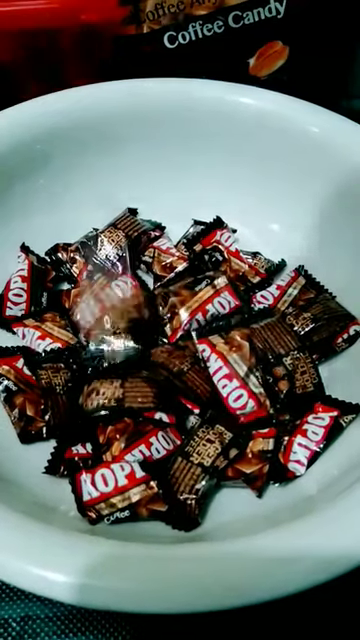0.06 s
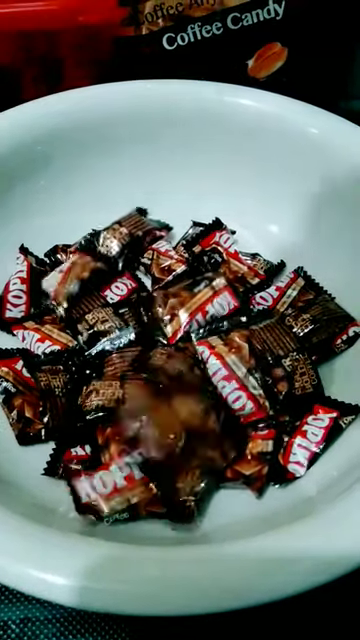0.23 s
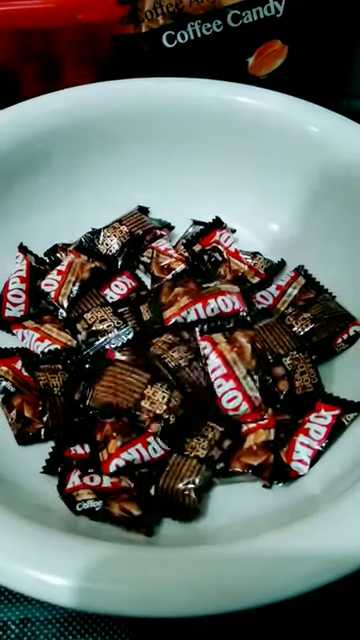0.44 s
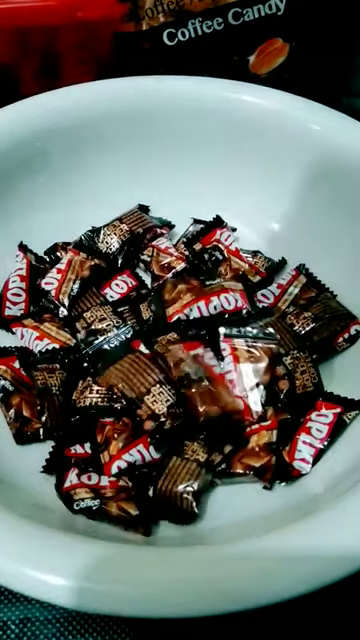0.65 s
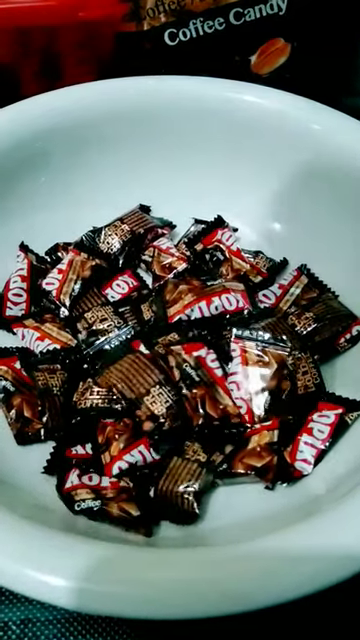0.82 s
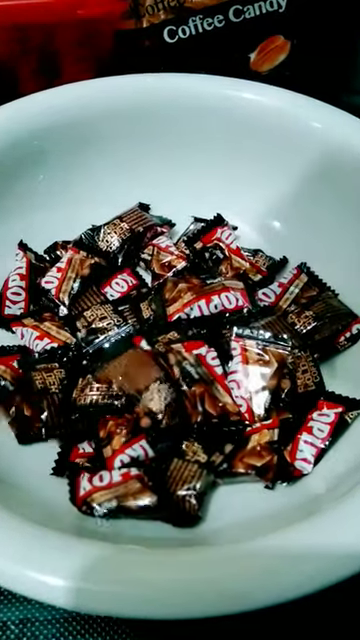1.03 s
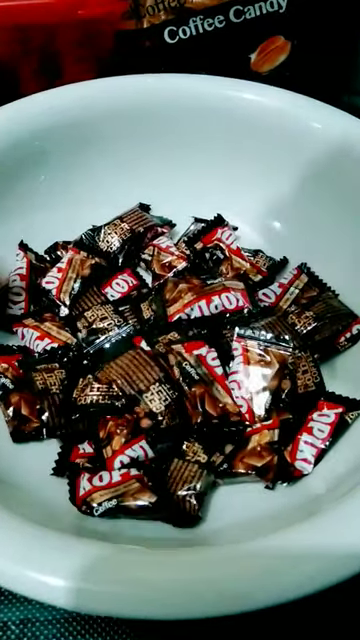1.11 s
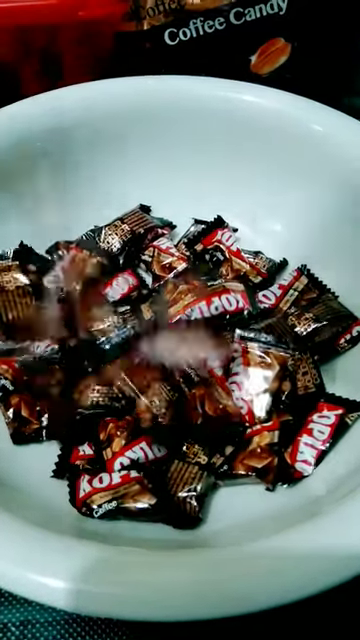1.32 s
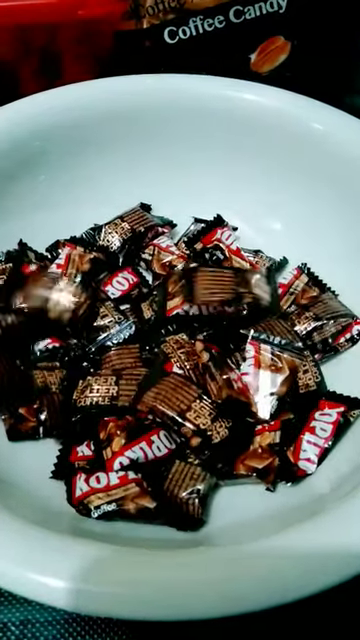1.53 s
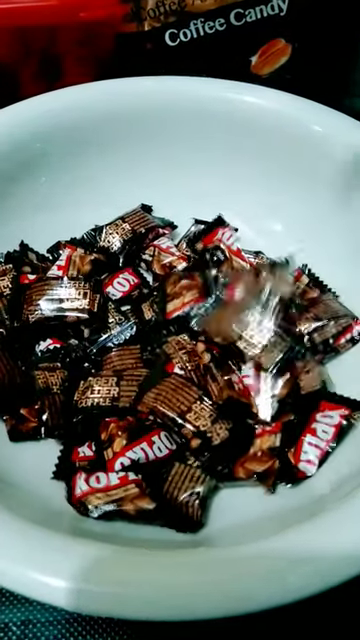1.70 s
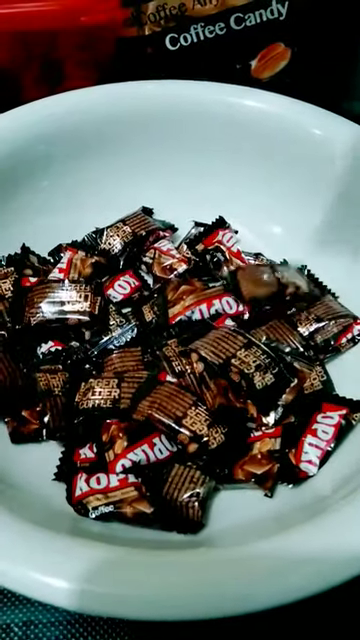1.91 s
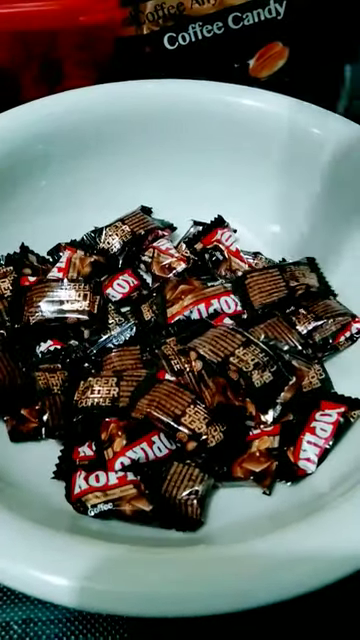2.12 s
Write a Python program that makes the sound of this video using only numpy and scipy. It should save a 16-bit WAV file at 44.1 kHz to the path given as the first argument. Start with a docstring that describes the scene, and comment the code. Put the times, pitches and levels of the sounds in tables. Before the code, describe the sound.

Wrapped hard candies drop onto a heap in a ceramic bowl, close by in a small quiet room. Foil crackles lightly first, then candies land with crinkly slaps and faint low thumps at about 0.25, 0.4, 0.7, 1.1, 1.5 and 1.9 seconds. Those at 0.25, 0.7 and 1.5 clink brightly. The bowl rings faintly near 1.25 seconds. Wrappers tick softly between drops and afterwards.

```python
"""Foil crackles in a hand, then wrapped hard candies drop one by one onto a heap in a ceramic bowl.
Each landing slaps and crinkles the foil (bursts of tiny snaps) and thumps the table (low damped modes).
Candy clinks brightly on candy or knocks dully through its wrapper, and one tumbles against the bowl
and rings it. Between drops the wrappers tick as they settle. All is close by, in a small quiet room."""
import sys
import numpy as np
from scipy import signal
from scipy.fft import rfft, irfft, next_fast_len
from scipy.io import wavfile
from scipy.ndimage import map_coordinates

SR = 44100
rng = np.random.default_rng(int(sys.argv[2]) if len(sys.argv) > 2 else 0)


def inscribe(sig):
    """Save sig as 16-bit PCM at rate SR to the path in sys.argv[1].

    A 1-D sig is mono; a 2-D sig holds one channel per row.
    Samples are clipped to [-1, 1] before scaling.
    """
    pcm = np.round(np.clip(np.atleast_2d(sig).T, -1, 1) * 32767)
    wavfile.write(sys.argv[1], SR, pcm.astype(np.int16))


N = 94815

# bright colour of crackling foil: f/Hz, level/dB
FOIL_COLOUR = [(200, -37), (1000, -28), (2000, -4), (2800, -10.5), (3800, -2.5), (4900, -6.5), (6000, -1),
               (6800, 3), (7700, -5), (9000, -16.5), (11500, -29.5), (15500, -29)]
ROOM_BUILD_S = 0.0033  # rise of the room's answer


def landings():
    """The foil crushes in a dense slap and crinkles on as it relaxes."""
    # candies landing and tumbling on the heap: t/s, level/dB, attack/s, t60/s, tilt/(dB per octave)
    impacts = [(.2392, -20, 0.00092, 0.05, 0), (0.2483, -26, 0.00062, 0.045, -4),
               (0.2526, -12.5, 0.00034, 0.031, 0.5), (.407, -13.5, 0.0013, 0.044, 1),
               (0.421, -25.5, .001, 0.03, -2), (0.7094, -19, .002, .03, 4.5),
               (0.7137, -12.5, 0.0014, 0.045, 0), (1.1294, -15.5, 0.00043, 0.027, 0),
               (1.1411, -15.5, 0.0012, 0.018, 2), (1.163, -30, .0005, 0.015, 1),
               (1.1727, -25.5, 0.00076, 0.033, 3.5), (1.2476, -25, 0.00094, 0.0263, -2),
               (1.494, -23.5, .002, 0.033, -5.5), (1.498, -14, 0.00092, 0.047, 2),
               (1.507, -18, 0.0014, 0.047, -1), (1.5297, -11.5, 0.0025, 0.03, 0),
               (1.5425, -22, 0.0017, 0.032, -4), (1.5477, -19, 0.00053, 0.052, 0),
               (1.8606, -30, 0.00067, 0.0092, 0), (1.8636, -15, 0.0014, 0.034, 1),
               (1.8775, -27, .001, 0.039, 2), (1.887, -22.5, 0.0009, 0.023, 3),
               (1.9058, -25, .0003, 0.01, 3)]
    # colour of the slap: f/Hz, level/dB
    slap_colour = [(100, -26.5), (300, -17.5), (600, -13.5), (900, -7.5), (1150, -13.5), (1450, -4.5),
                   (2300, -1.5), (3600, 1), (4900, -3), (6500, 4), (7700, -1.5), (9000, -17),
                   (11500, -27.5), (15500, -27.5)]
    out, t = np.zeros(N), np.arange(SR // 4) / SR
    for s, db, attack_s, t60, slope_db in impacts:
        slap = grains(len(t), per_s=14000, spread_db=1.0) * strike(t, attack_s, t60)
        crinkle = grains(len(t), per_s=860, spread_db=4.0) * strike(t, attack_s=0.0056, t60=0.14)
        landing = coloured(slap, slap_colour, slope_db) + amp(-22.5) * coloured(crinkle, FOIL_COLOUR)
        add(out, s, amp(db) * landing)
    return out


def clinks():
    """Candy strikes candy with a short bright ring."""
    # hard contacts: t/s, level/dB, tilt/(dB per octave)
    contacts = [(.2527, -9.5, 0), (0.7148, -18.5, -2.5), (.7185, -10.5, -2), (1.4985, -18.5, -4),
                (1.5065, -12.5, -1), (1.5472, -28, -6)]
    out = np.zeros(N)
    for s, db, slope_db in contacts:
        add(out, s, amp(db) * candy_ring(slope_db))
    return out


def candy_ring(slope_db):
    """A candy's modes die quickly, then hang on in the room, fluttering in level and phase."""
    # modes of a hard candy: f/Hz, level/dB, t60/s
    modes = [(2273, -12.5, 0.049), (2414, 2, 0.068), (2560, -18, .04), (4164, -11.5, 0.049),
             (4262, -9.5, 0.099), (5902, -27, .07), (6220, -9.5, 0.079), (6830, -9.5, 0.077),
             (7454, -23, .05), (7774, -9, 0.073), (8100, -19, 0.073)]
    flutter_db, flutter_per_s = 3, 85
    t = np.arange(SR // 2) / SR
    out = np.zeros(len(t))
    for hz, db, t60 in modes:
        phase = 2 * np.pi * (hz * t + rng.random())
        direct = strike(t, attack_s=0.00084, t60=t60) * np.sin(phase)
        flutter = amp(flutter_db * wobble(t, flutter_per_s))
        wavering_tone = np.cos(phase + 0.5 * wobble(t, flutter_per_s))
        echo = amp(-16.5) * strike(t, ROOM_BUILD_S, t60=0.28) * flutter * wavering_tone
        out += amp(db) * tilt(hz, slope_db) * (direct + echo)
    return out


def knocks():
    """Cushioned by foil, a candy gives one heavily damped note."""
    # dull knocks through the wrapper: t/s, level/dB, f/Hz
    blows = [(.253, -30, 877), (.408, -25, 1380), (.7165, -32.5, 952), (1.1295, -21.5, 2382),
             (1.1415, -41, 478), (1.1418, -38, 883), (1.163, -34, 2200), (1.499, -36, 1020),
             (1.507, -25, 1565), (1.864, -36, 718)]
    out, t = np.zeros(N), np.arange(SR // 8) / SR
    for s, db, hz in blows:
        add(out, s, amp(db) * strike(t, attack_s=0.0007, t60=0.036) * np.sin(2 * np.pi * hz * t))
    return out


def bowl():
    """One glancing knock sets the bowl singing, lower and longer than a candy."""
    # modes of the ceramic bowl: f/Hz, level/dB, t60/s
    modes = [(643.5, -15.5, 0.53), (1611, -0.5, 0.27), (2904, 0, .15), (4517, -1.5, .11)]
    out = np.zeros(N)
    add(out, s=1.2478, sound=amp(-33.5) * ring(modes, attack_s=0.0006, scatter_db=0.5))
    return out


def foil_ticks():
    """Creases in the foil snap over, each a click of noise with its own brief pitch."""
    # single snaps: t/s, level/dB, tilt/(dB per octave), crease f/Hz
    ticks = [(.015, -30, -5, 6540), (.040, -36, -2, 2980), (.047, -29.5, -4, 4600),
             (0.0546, -18.5, -1, 6570), (0.0759, -24.5, -3.5, 3770), (0.0891, -24.5, -1.5, 6920),
             (.096, -34, -8, 2090), (0.115, -21.5, -0.5, 6560), (0.149, -30.5, -3.5, 7100),
             (0.162, -35, 1, 6000), (0.1735, -20.5, 2, 6790), (0.183, -30, 0, 3860),
             (0.201, -30.5, 1, 2420), (.212, -28, -2, 2880), (0.2216, -29, 0, 5650), (.3108, -26, -4, 2450),
             (.3617, -30, 7, 5960), (.3755, -24, -3.5, 2300), (.3797, -27.5, -5, 5840),
             (.390, -28, -4, 3460), (.554, -38.5, -9.5, 2770), (0.6122, -29, -0.5, 3760),
             (0.658, -33, 0, 7100), (0.835, -36.5, 1, 4000), (0.862, -36.5, -1.5, 6200),
             (0.9174, -31, -1, 3180), (.998, -46, -1, 5500), (1.041, -35, 1, 6800),
             (1.0454, -30, 1.5, 3930), (1.1044, -35.5, -1, 5540), (1.205, -42, 9, 6500),
             (1.339, -37.5, 1, 3800), (1.504, -20, 16, 6940), (1.641, -31, -2.5, 6500),
             (1.7401, -33, -1.5, 7200), (1.795, -40.5, -1, 6000), (1.816, -41, 2, 7640),
             (1.8243, -33, -0.5, 5630), (1.974, -35, -1, 6200), (2.051, -39, -4, 5350),
             (2.104, -41.5, 6, 5200), (2.125, -42.5, 5, 5600)]
    attack_s = 0.00012
    out, t = np.zeros(N), np.arange(SR // 20) / SR
    for s, db, slope_db, hz in ticks:
        burst = rng.choice([-1, 1], len(t)) * strike(t, attack_s, t60=0.01)
        snap = coloured(burst, FOIL_COLOUR, slope_db)
        crease = amp(-0.5) * strike(t, attack_s, t60=0.009) * np.sin(2 * np.pi * hz * t)
        add(out, s, amp(db) * (snap + crease))
    return out


def foil_rustle():
    """Tiny snaps blur into a fine rustle, first in the hand and then on the heap."""
    # swell and fade of the rustle: t/s, level/dB
    contour = [(0, -39), (.1, -52), (.135, -55), (.23, -54.5), (.39, -47.5), (.5, -54.5), (.68, -76.5),
               (.9, -65), (1.06, -74.5), (1.3, -50.5), (1.45, -72.5), (1.7, -60), (1.95, -81),
               (2.04, -62.5), (2.11, -59.5), (2.15, -63.5)]
    level_db = np.interp(np.arange(N) / SR, *np.transpose(contour))
    return amp(level_db) * coloured(grains(N, per_s=900, spread_db=3.5), FOIL_COLOUR, slope_db=-4)


def table_thumps():
    """The table answers each drop with a soft low thump."""
    # the weight of each drop reaching the table: t/s, level/dB
    drops = [(.25, -47.5), (.408, -47), (.715, -65), (1.136, -54), (1.529, -52.5), (1.865, -52)]
    # modes of the table under the bowl: f/Hz, level/dB, t60/s
    modes = [(119.4, -9, .3), (157, 0.5, 0.41), (277, -6.5, .2), (424, -3, .12)]
    out = np.zeros(N)
    for s, db in drops:
        add(out, s, amp(db) * ring(modes, attack_s=0.012))
    return out


def room_tail(x):
    """The small room's reverb of x; each frequency dies at its own speed."""
    # decay of the room: f/Hz, t60/s
    decay = [(150, 1), (500, 0.38), (1400, .31), (3500, 0.3), (7000, 0.34), (11000, 0.28), (16000, 0.21)]
    hz, t, noise = signal.stft(rng.standard_normal(SR * 3 // 4), SR, nperseg=256)
    envelope = strike(t, ROOM_BUILD_S, along(decay, hz)[:, None])
    tail = signal.istft(noise * envelope, SR, nperseg=256)[1]
    return signal.fftconvolve(x, tail / np.linalg.norm(tail))[:N]


def room_hush():
    """The still room lays a faint bed of low noise under everything."""
    # colour of the hush: f/Hz, level/dB
    hush_colour = [(25, -15), (45, -23), (65, -2), (90, -2.5), (120, 1), (260, -0.5), (500, -3.5),
                   (1000, -10), (2500, -16), (7000, -22), (9000, -35), (15500, -40)]
    return amp(-60.5) * coloured(rng.standard_normal(N + SR), hush_colour)[SR:]


def amp(db):
    """Decibels to gain."""
    return 10 ** (np.asarray(db) / 20)


def along(points, hz):
    """Interpolate (f/Hz, value) points on a log frequency axis."""
    f, values = np.transpose(points)
    return np.interp(np.log(hz + 1), np.log(f + 1), values)


def tilt(hz, slope_db):
    """Gain of a treble slope in dB per octave, pivoting at 4 kHz."""
    return amp(slope_db * np.log2(np.clip(hz, 1800, 14000) / 4000))


def coloured(x, colour, slope_db=0):
    """x through a causal filter of unit energy with the given colour and treble tilt."""
    size = 2048
    hz = np.fft.rfftfreq(size, 1 / SR)
    cepstrum = irfft(np.log(amp(along(colour, hz)) * tilt(hz, slope_db)))
    cepstrum[1:size // 2] *= 2  # fold to minimum phase, keeping attacks sharp
    cepstrum[size // 2 + 1:] = 0
    impulse = irfft(np.exp(rfft(cepstrum)))
    return signal.fftconvolve(x, impulse / np.linalg.norm(impulse))[:len(x)]


def strike(t, attack_s, t60):
    """A quick rise and an exponential decay of 60 dB in t60 seconds."""
    return (1 - np.exp(-t / attack_s)) * amp(-60 * t / t60)


def grains(n, per_s, spread_db):
    """Tiny random snaps of uneven size, rms 1."""
    snaps = (rng.random(n) < per_s / SR) * rng.choice([-1, 1], n)
    snaps = snaps * amp(spread_db * np.clip(rng.standard_normal(n), -2, 2))
    return snaps / np.sqrt(np.mean(snaps ** 2) + 1e-20)


def ring(modes, attack_s, scatter_db=1):
    """Damped modes, excited a little differently by every blow."""
    t = np.arange(SR // 2) / SR
    out = np.zeros(len(t))
    for hz, db, t60 in modes:
        gain = amp(db + scatter_db * rng.standard_normal())
        out += gain * strike(t, attack_s, t60) * np.sin(2 * np.pi * (hz * t + rng.random()))
    return out


def wobble(t, per_s):
    """A smooth random curve with per_s knots a second."""
    return map_coordinates(rng.standard_normal(512), [t * per_s], mode="wrap")


def add(track, s, sound):
    """Mix a sound into the track at s seconds."""
    part = track[max(0, round(s * SR)):][:len(sound)]
    part += sound[:len(part)]


def scene():
    """Mono mix: foil and knocks with their reverb, then clinks, bowl, table and hush."""
    clatter = landings() + knocks() + foil_ticks() + foil_rustle()
    hush = room_hush()
    reverb = amp(-8) * room_tail(clatter)
    return (clatter + reverb + clinks() + bowl() + table_thumps() + hush)[None]


def record(dry):
    """A steep, smooth low-pass trims the very top of the treble."""
    top_hz, edge_hz = 16100, 600
    size = next_fast_len(N + SR // 2)
    edge = np.clip((top_hz - np.fft.rfftfreq(size, 1 / SR)) / edge_hz, 0, 1)
    return irfft(rfft(dry, size) * np.sin(np.pi / 2 * edge) ** 2, size)[..., :N]


dry = scene()
out = record(dry)
inscribe(out)
```